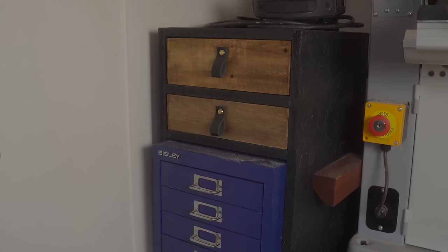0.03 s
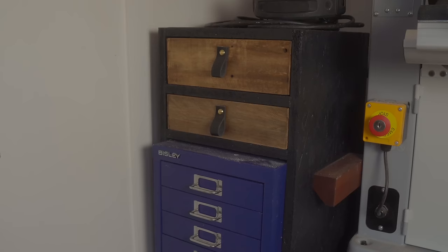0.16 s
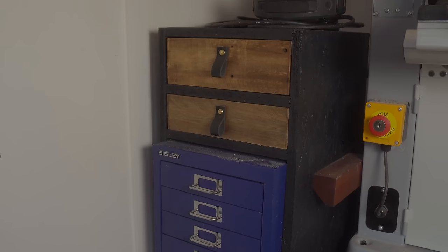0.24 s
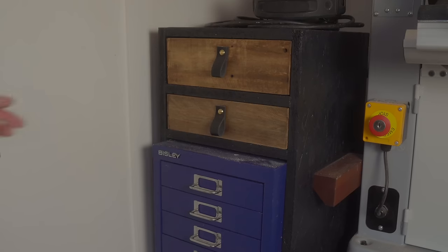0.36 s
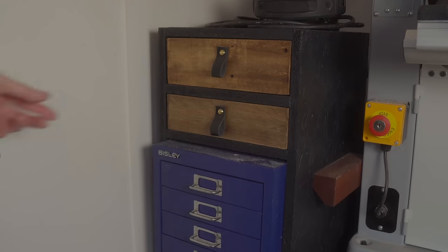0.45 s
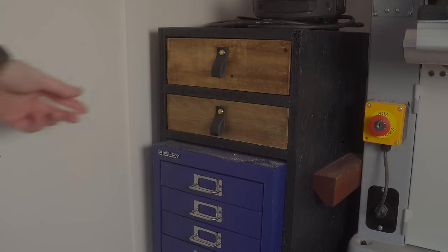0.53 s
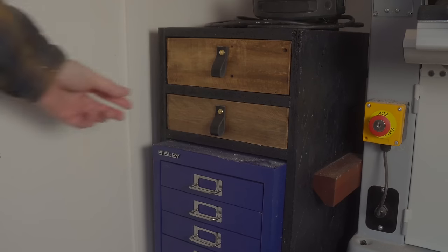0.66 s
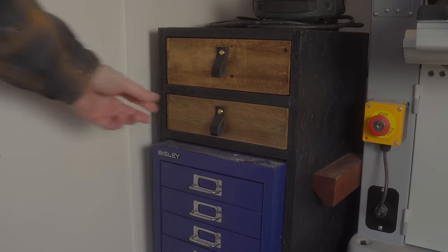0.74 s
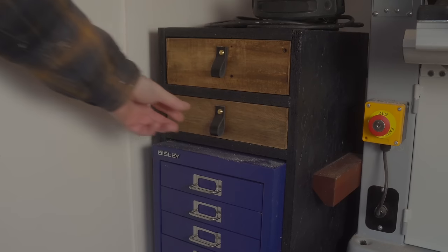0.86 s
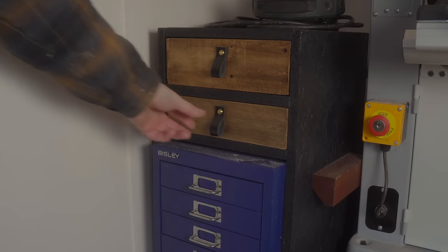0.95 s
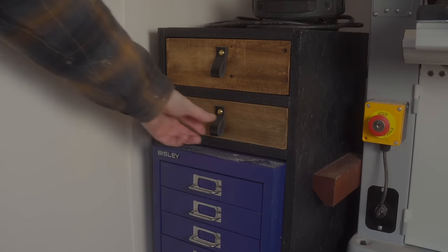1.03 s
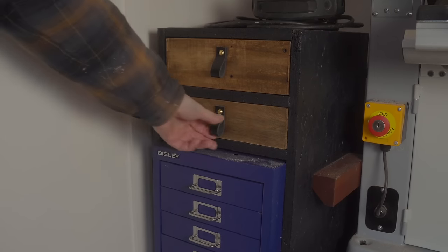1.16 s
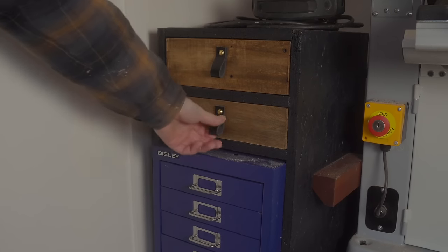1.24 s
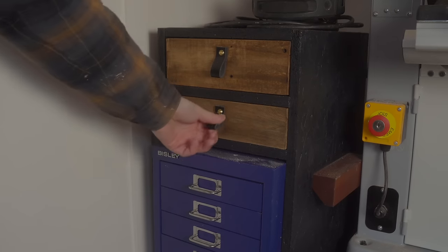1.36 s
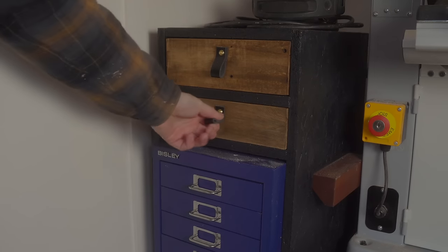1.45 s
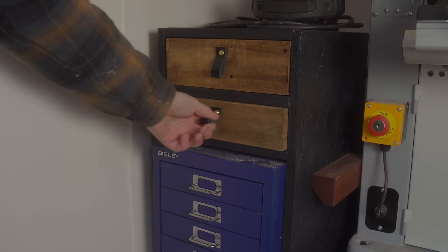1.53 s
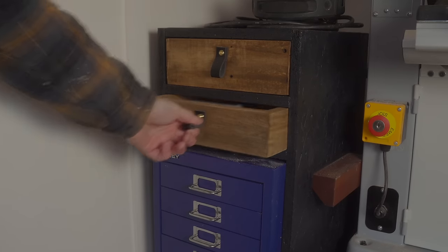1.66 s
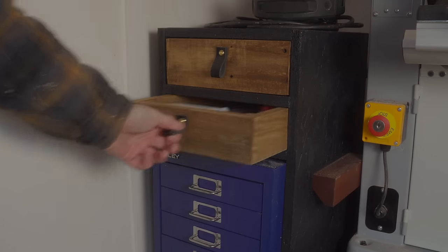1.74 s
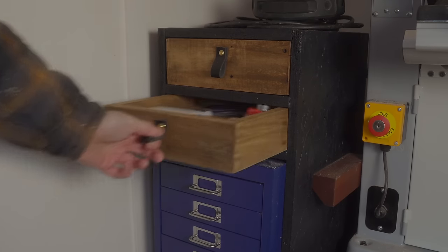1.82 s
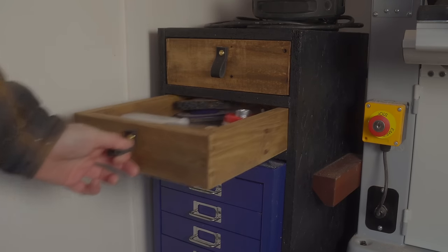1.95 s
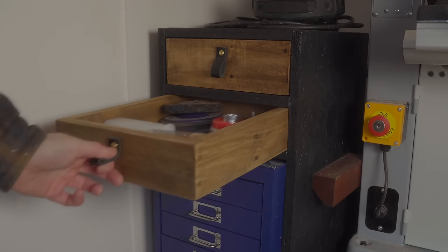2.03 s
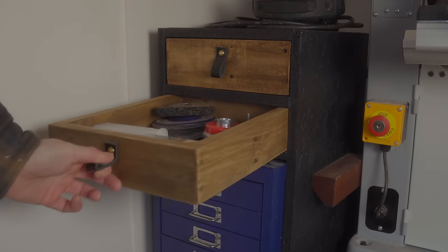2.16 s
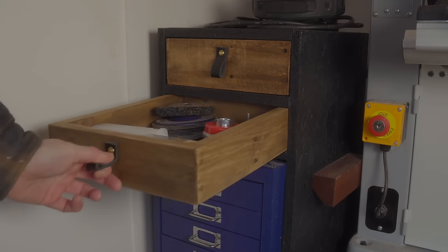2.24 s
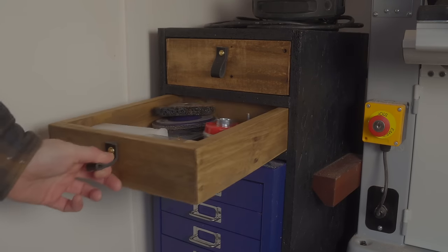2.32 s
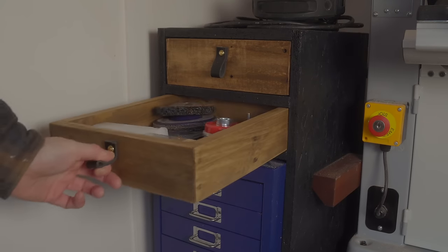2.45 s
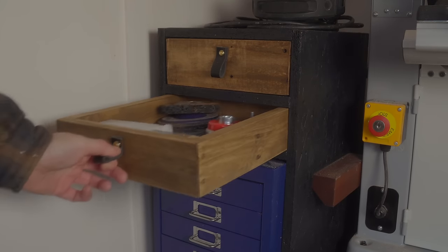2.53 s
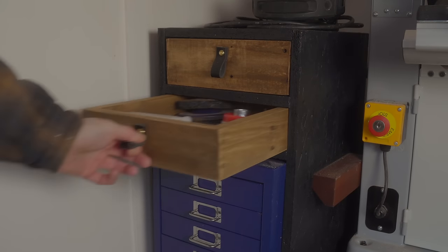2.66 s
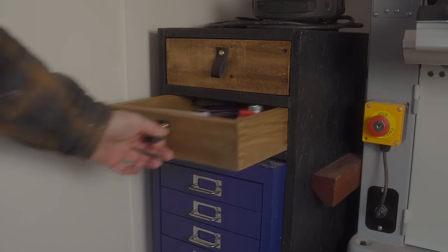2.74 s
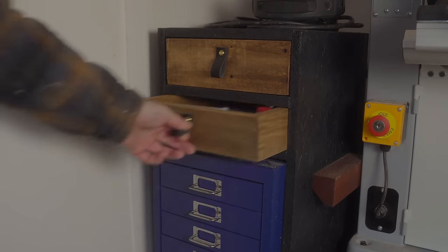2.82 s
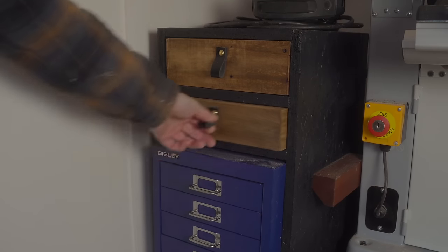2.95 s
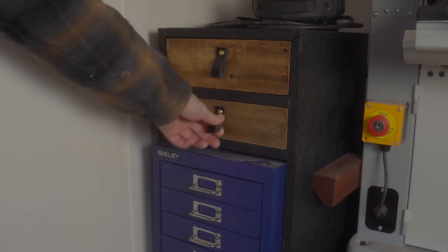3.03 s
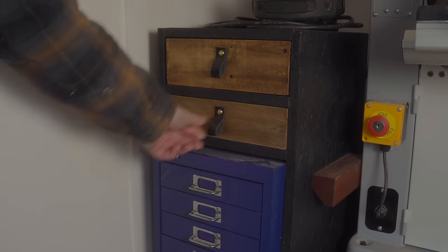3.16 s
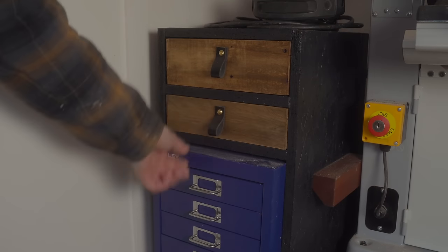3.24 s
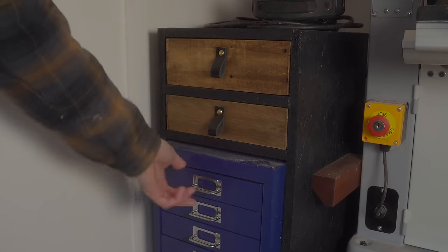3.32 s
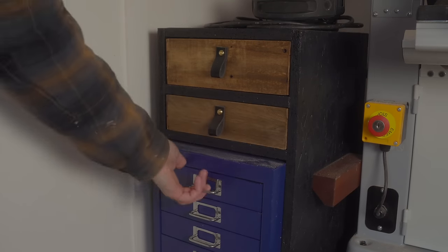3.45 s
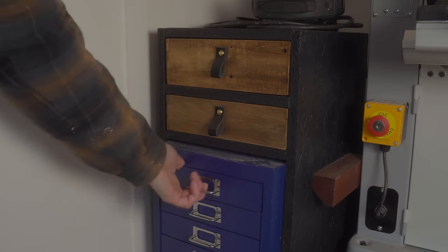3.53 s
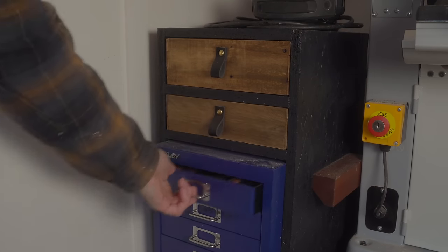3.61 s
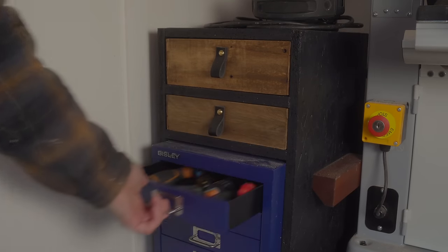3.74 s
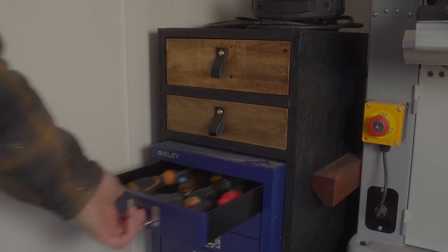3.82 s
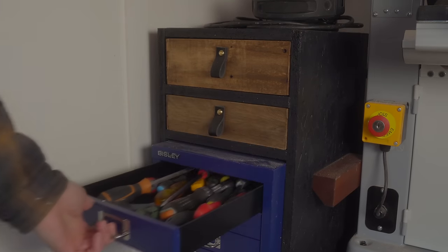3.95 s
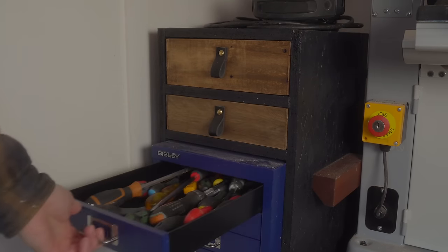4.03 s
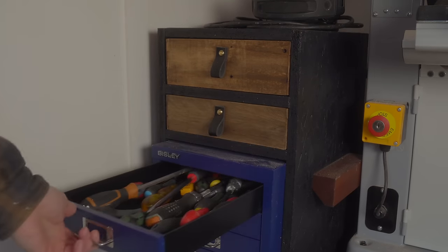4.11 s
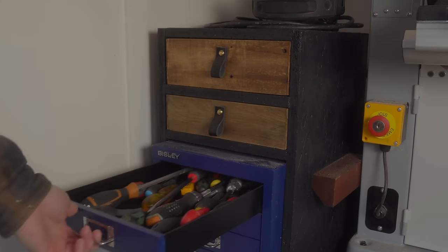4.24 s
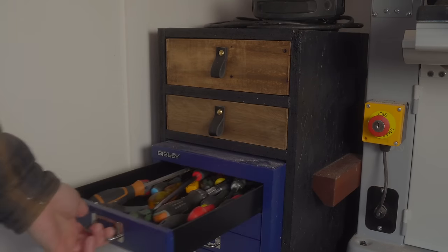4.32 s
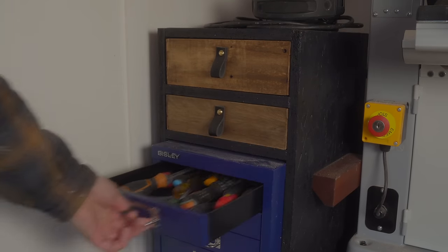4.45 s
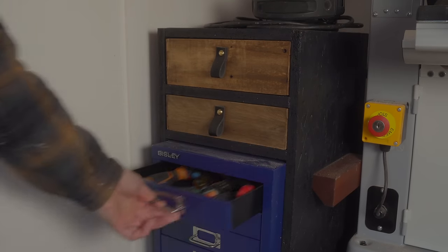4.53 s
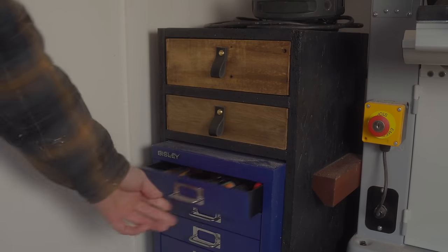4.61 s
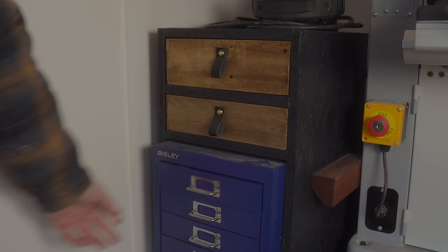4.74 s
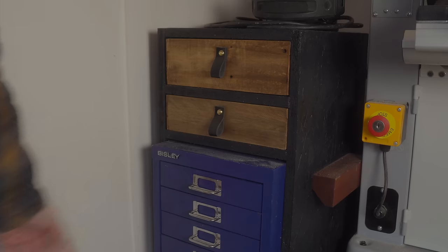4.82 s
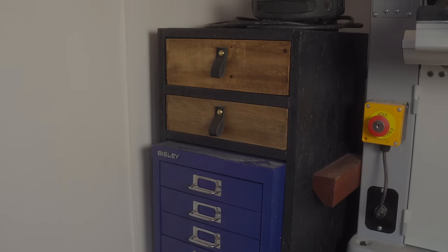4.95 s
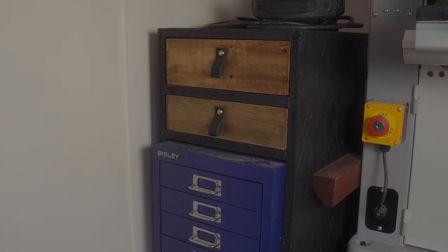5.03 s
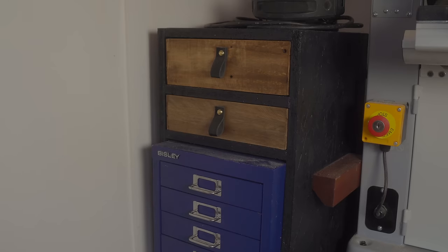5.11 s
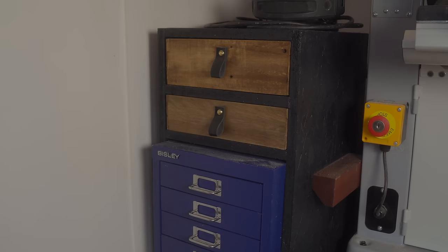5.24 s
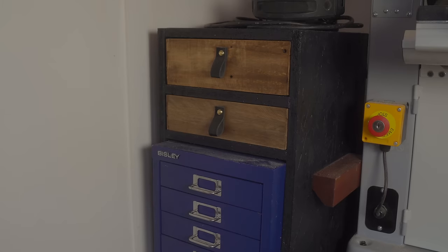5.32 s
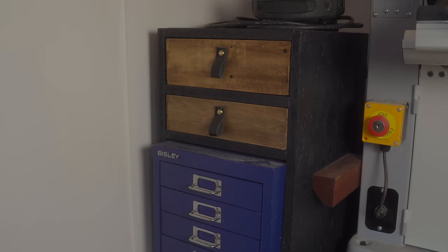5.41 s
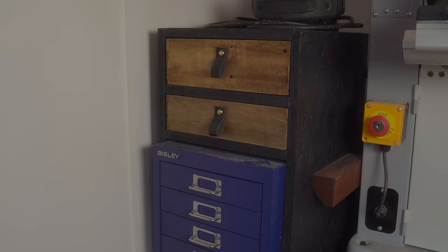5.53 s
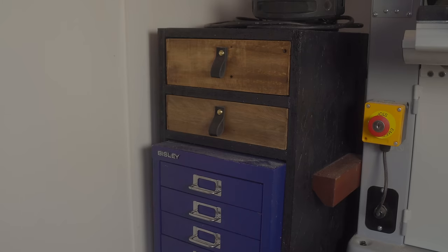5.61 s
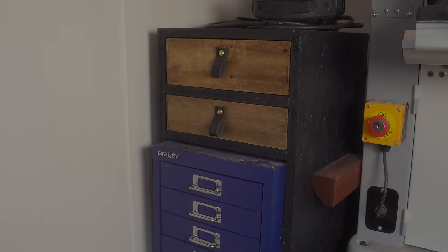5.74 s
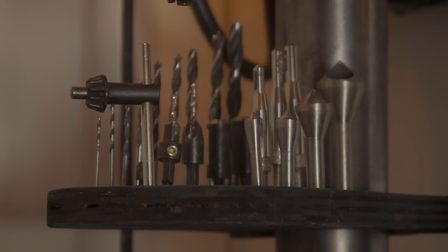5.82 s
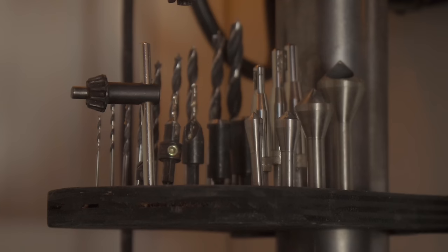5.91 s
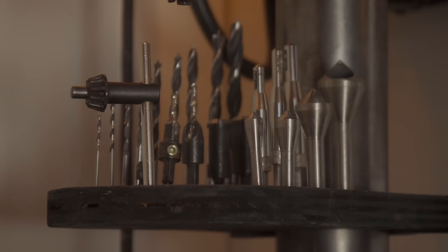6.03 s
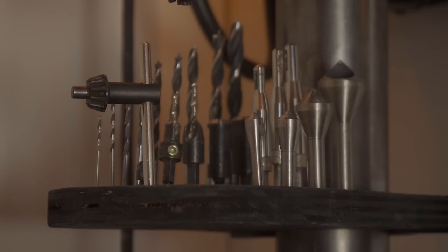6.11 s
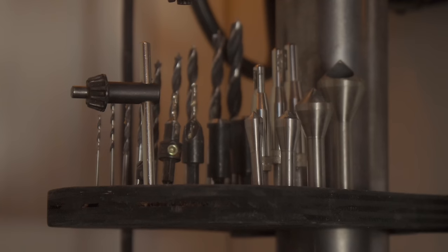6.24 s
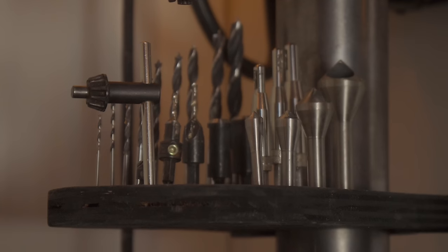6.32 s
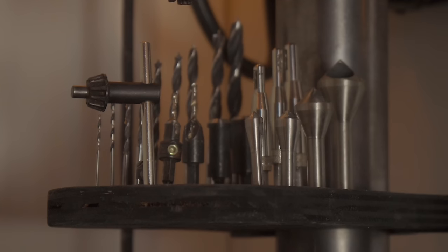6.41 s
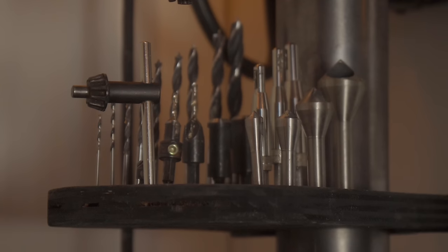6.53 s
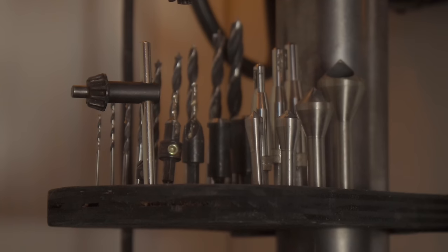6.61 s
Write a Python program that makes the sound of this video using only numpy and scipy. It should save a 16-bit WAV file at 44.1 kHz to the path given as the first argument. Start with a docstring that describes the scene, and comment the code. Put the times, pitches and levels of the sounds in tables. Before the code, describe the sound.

A loaded wooden drawer is pulled open and shoved shut with knocks, then a thin steel tool drawer slides out and clanks closed in a workshop.

```python
"""Two drawers in a small workshop

Close, in mono: a hand pulls a loaded wooden drawer open and pushes it shut, then a thin steel drawer below it.
Random slips of the runners and short blows, as tools shift and knock inside, ring the modes of each box;
coloured grains make the rasp. Clothes rustle and feet shift in shaped noise, soles thud on floorboard modes,
and feedback delays give the room. The quiet noise of the room drops near the end.
"""
import sys
import numpy as np
from scipy import signal
from scipy.fft import rfft, irfft, next_fast_len
from scipy.io import wavfile

SR = 44100
rng = np.random.default_rng(int(sys.argv[2]) if len(sys.argv) > 2 else 0)


def volts_from_db(level):
    """Convert decibel levels to linear amplitude ratios."""
    exponent = np.asarray(level, float) / 20
    return 10 ** exponent


def inscribe(sig):
    """Save sig as 16-bit PCM at rate SR to the path in sys.argv[1].

    A 1-D sig is mono; a 2-D sig holds one channel per row.
    Samples are clipped to [-1, 1] before scaling.
    """
    pcm = np.round(np.clip(np.atleast_2d(sig).T, -1, 1) * 32767)
    wavfile.write(sys.argv[1], SR, pcm.astype(np.int16))


N = 294147


def rms_one(x):
    """Scale to unit rms."""
    return x / np.sqrt(np.mean(x ** 2) + 1e-20)


def gains(strokes):
    """Turn every dB column into a gain in time, all but silent outside the strokes."""
    t = np.arange(N) / SR
    out = 0
    for rows in strokes:
        time_s, *columns = np.transpose(rows)
        out = out + np.array([volts_from_db(np.interp(t, time_s, db, -150, -150)) for db in columns])
    return out


def drift(rate_hz):
    """Slow random wander of rms 1: noise through two equal one-pole low-passes at rate_hz."""
    step = 20      # samples between wander points
    pole = np.exp(-2 * np.pi * rate_hz * step / SR)
    noise = rng.standard_normal(N // step + 2002)
    slow = signal.lfilter([1], [1, -2 * pole, pole ** 2], noise)[2000:]      # past the filter's run-in
    return np.interp(np.arange(N) / step, np.arange(len(slow)), rms_one(slow))


def colour(x, spectrum):
    """Minimum-phase shaping of x to a spectrum, rms gain 1 on white noise."""
    hz, db = np.transpose(spectrum)
    grid_hz = np.maximum(np.fft.rfftfreq(8192, 1 / SR), 1)
    magnitude = volts_from_db(np.interp(np.log(grid_hz), np.log(hz), db))
    cepstrum = irfft(np.log(magnitude))
    # folding the cepstrum forward makes the phase minimum
    cepstrum[1:4096] *= 2
    cepstrum[4097:] = 0
    response = irfft(np.exp(rfft(cepstrum)))
    return signal.fftconvolve(x, response / np.linalg.norm(response))[:N]


def grains(per_s, spread_db):
    """Random clicks of uneven size and either sign, rms 1."""
    size_db = spread_db * np.minimum(rng.exponential(1, N), 5)
    clicks = volts_from_db(size_db) * rng.choice([-1, 1], N)
    return rms_one(clicks * (rng.random(N) < per_s / SR))


def ring(push, hz, t60_s):
    """A mode: a unit click sets a dying sine of height 1 ringing."""
    r = volts_from_db(-60 / (t60_s * SR))
    w = 2 * np.pi * hz / SR
    return signal.lfilter([0, np.sin(w)], [1, -2 * r * np.cos(w), r * r], push + 1e-18)


def contacts(at_s, db, length_s, crisp):
    """Each blow is a dying chatter of force, unit energy times its level, with a click on its first sample."""
    out = np.zeros(N)
    span = 4000      # samples
    noise = rng.standard_normal((len(at_s), span))
    for s, level_db, tau_s, jolt in zip(at_s, db, length_s, noise):
        chatter = jolt * np.exp(-np.arange(span) / (max(tau_s, 3e-4) * SR))
        burst = chatter / np.linalg.norm(chatter)
        burst[0] += crisp
        start = round(s * SR)
        out[start:start + span] += volts_from_db(level_db) * burst
    return out


def room_tone():
    """Steady coloured noise, switching to a duller, quieter one near the end."""
    drop_s = 5.862
    # room noise before the drop: hz, level_db (per Hz, relative)
    early_spectrum = [(15, -38), (25, -8), (296, -4), (399, -10), (687, -7), (831, -13), (14400, -26),
                      (16500, -33)]
    # room noise after the drop: hz, level_db (per Hz, relative)
    late_spectrum = [(25, -7), (70, -4), (130, 2), (250, -7.5), (500, -8.5), (900, -11), (1200, -18),
                     (4000, -21), (8000, -21.5), (15000, -23.5), (16500, -34.5)]
    early = volts_from_db(-65) * colour(rng.standard_normal(N), early_spectrum)
    late = volts_from_db(-68) * colour(rng.standard_normal(N), late_spectrum)
    return np.where(np.arange(N) < drop_s * SR, early, late)


def rustle():
    """Cloth whispers above as coloured grains, weight shifts below as coloured noise."""
    # strokes of clothes and shuffling: time_s, low_db, high_db
    strokes = [
        [(0.0, -55, -57.5), (0.132, -63, -56.5), (0.168, -55, -53), (0.348, -68.5, -65), (0.42, -62, -64.5),
         (1.04, -65, -62.5), (1.096, -54.5, -68), (1.128, -72, -61), (1.15, -56, -66), (1.26, -81, -78),
         (1.5, -95, -94)],
        [(5.05, -58, -83), (5.152, -72, -68), (5.17, -55.5, -65), (5.25, -59, -69.5), (5.5, -74, -67.5),
         (5.86, -78, -68.5)],
    ]
    # rubbing cloth: hz, level_db (per Hz, relative)
    cloth_spectrum = [(530, -19.5), (900, -0.5), (1040, -10), (1360, -6), (1990, -7.5), (2830, -8.5),
                      (13800, -15.5), (16000, -18.5)]
    # shuffling: hz, level_db (per Hz, relative)
    shuffle_spectrum = [(47, -61), (80, -21), (123, -11.5), (260, -1.5), (305, -5.5), (353, -4),
                        (1500, -19.5), (1950, -46), (3300, -120)]
    low, high = gains(strokes)
    whisper = high * volts_from_db(0.5 * drift(43.0)) * grains(9000., 2.0)
    shuffle = low * volts_from_db(1.9 * drift(19.0)) * rng.standard_normal(N)
    return colour(whisper, cloth_spectrum) + colour(shuffle, shuffle_spectrum)


def footfalls():
    """Soft soles set the floor thudding: short chatters of force ring its modes."""
    # footfalls: start_s, level_db (relative), contact_s
    steps = [(0.381, -52.5, 0.025), (0.62, -29, 0.12), (5.168, -49, 0.028)]
    # floorboard modes: hz, level_db (relative), t60_s
    floor_modes = [(74, -10, 0.24), (119.7, -4.5, 0.21), (219, 2.5, 0.072), (278, -1.5, 0.092),
                   (386, 5, 0.093), (520, 0.5, 0.052), (603, -9.5, 0.12), (795, -7, 0.025),
                   (1230, -0.5, 0.0073)]
    start_s, level_db, contact_s = np.transpose(steps)
    push = contacts(start_s, level_db - 11.0, contact_s, crisp=0.72)
    out = np.zeros(N)
    for k, (hz, mode_db, t60_s) in enumerate(floor_modes):
        out += (-1) ** k * volts_from_db(mode_db) * ring(push, hz, t60_s)
    return out


def drawer(strokes, centre, knocks, modes, rasp, tick, slips, chatter_db, rasp_share, blow_db,
           split, focus_db, lean_db, roam_db, crisp):
    """Slips of the runners and blows drive the same modes; rasp and ticks are too dense in modes to ring.

    blow_db and crisp are for clack, thump and tick; slips are for low modes, high modes and rasp.
    """
    thump_top_hz = 800      # modes below take the thump, those above the clack
    rumble, hiss = gains(strokes)
    # the edges chatter between rumble and rasp
    chatter = volts_from_db(chatter_db) * rumble ** (1 - rasp_share) * hiss ** rasp_share
    rumble_hz = np.interp(np.arange(N) / SR, *np.transpose(centre))
    start_s, clack_db, thump_db, tick_db, clack_hz = np.transpose(knocks)
    # 15 ms of chatter at a -21 dB thump: longer when heavier, shorter when clacking above 1100 Hz
    length_s = 0.015 * volts_from_db(0.16 * (thump_db + 21)) * np.minimum(1100 / clack_hz, 1)
    low_slips, high_slips, rasp_slips = slips
    ticks = contacts(start_s, tick_db + blow_db[2], length_s, crisp[2])
    out = colour(hiss * rasp_slips, rasp) + colour(ticks, tick)
    for k, (hz, level_db, t60_s) in enumerate(modes):
        # the rubbing spot roams; a long ring piles up more slips
        steady = volts_from_db(roam_db * drift(4.2)) / np.sqrt(t60_s * SR / 2.0)
        if hz < thump_top_hz:
            # how far the box is held picks the modes that speak
            lean = volts_from_db(-lean_db * np.minimum(np.log2(hz / rumble_hz) ** 2, 1.2))
            thumps = contacts(start_s, thump_db + blow_db[1], length_s, crisp[1])
            push = lean * (steady * rumble * low_slips + thumps)
            out += (-1) ** k * volts_from_db(level_db) * ring(push, hz, t60_s)
        else:
            # a blow favours modes near its own pitch
            near_db = -focus_db * np.log2(hz / clack_hz) ** 2
            clacks = contacts(start_s, clack_db + blow_db[0] + near_db, length_s, crisp[0])
            push = steady * chatter * high_slips + clacks
            for side in (-1, 0, 1):      # sides, back and bottom ring at neighbouring pitches
                side_hz = hz * (1 + side * split)
                out += (-1) ** (k + side) * volts_from_db(level_db) * ring(push, side_hz, t60_s)
    return out


def wooden_drawer():
    """Wood sticks and lets go: few, lumpy slips under a fast random judder."""
    # drag on the runners, pulled then pushed: time_s, rumble_db, rasp_db (all relative)
    wood_slide = [
        [(1.55, -54.5, -56.5), (1.61, -43, -63.5), (1.644, -28, -50.5), (1.75, -30, -56), (1.765, -9.5, -50),
         (1.80, -26.5, -47.5), (1.85, -20, -49.5), (1.961, -24, -49.5), (2.05, -43, -56.5), (2.07, -34, -51.5),
         (2.235, -32.5, -45.5), (2.336, -35, -47.5), (2.39, -60, -89), (2.47, -48, -90)],
        [(2.5, -51, -82), (2.608, -44, -58.5), (2.706, -33, -52), (2.76, -32.5, -50.5), (2.84, -34, -51.5),
         (2.9, -25, -42.5), (2.986, -31, -53), (3.04, -24.5, -47), (3.069, -23, -45.5), (3.074, -4.5, -56),
         (3.147, -11.5, -47), (3.152, -21, -50), (3.19, -23, -45.5), (3.236, -42, -53), (3.376, -45.5, -83),
         (3.5, -58, -63)],
    ]
    # where the rumble is centred as load and grip change: time_s, centre_hz
    wood_centre = [(1.7, 430), (1.78, 341), (1.86, 410), (2.23, 375), (2.27, 553), (2.6, 416), (2.85, 385),
                   (3.04, 450), (3.075, 556), (3.15, 525), (3.172, 420)]
    # blows on wood: start_s, clack_db, thump_db, tick_db (all relative), clack_hz
    wood_blows = [(1.086, -65, -54, -52, 1060), (1.15, -44.5, -72, -70, 1310),
                  (1.542, -34.5, -52, -40, 2520), (1.637, -24.5, -24, -40, 1280),
                  (1.666, -21.5, -23.5, -66, 1400), (1.698, -15, -29.5, -50.5, 930),
                  (1.805, -18.5, -19.5, -38, 900), (1.812, -40.5, -15, -50, 826),
                  (1.849, -35, -19, -58, 1180), (1.956, -29, -26.5, -33, 1170), (2.056, -20, -21, -44, 930),
                  (2.142, -14, -29.5, -71.5, 2460), (2.178, -12, -23, -29, 875),
                  (2.241, -7, -32.5, -44, 2160), (2.248, -3, -30.5, -39, 1160),
                  (2.285, -10, -23.5, -83.5, 1760), (2.661, -18, -47, -72, 1100),
                  (2.844, -24, -19.5, -51.5, 837), (2.858, -14, -14.5, -39, 1040),
                  (2.867, -7.5, -19.5, -25, 1020), (2.9, -16, -14, -35.5, 896),
                  (3.014, -31.5, -21.5, -58, 880), (3.072, -9.5, -6.5, -31.5, 760),
                  (3.098, -14, -6.5, -32.5, 830), (3.125, -18, -6.5, -35.5, 867),
                  (3.162, -15.5, -34.5, -35.5, 834), (3.198, -23.5, -25, -63, 1250)]
    # wooden box modes: hz, level_db (relative), t60_s
    wood_modes = [(81.5, -21.5, 0.59), (131, -24, 0.2), (190, -29, 0.068), (259.2, -10, 0.21),
                  (283, -6, 0.049), (337.5, 2, 0.041), (416.3, -1.5, 0.062), (466.7, 0.5, 0.058),
                  (529.6, -4.5, 0.022), (638.6, -2, 0.048), (734, -0.5, 0.024), (880, 4.5, 0.022),
                  (1020, -7, 0.018), (1097.5, 1.5, 0.038), (1241.4, -1, 0.032), (1400, -4, 0.023),
                  (1622, -3.5, 0.026), (1725, 1.5, 0.018), (1803, -0.5, 0.028), (2170, 1, 0.015),
                  (2630, -9, 0.035), (2930, -2.5, 0.017), (3180, -16.5, 0.028), (3600, -14.5, 0.09),
                  (4080, -16.5, 0.047), (4570, -15, .02), (5670, -20, 0.023), (6266, -15, 0.015)]
    # wood rasp: hz, level_db (per Hz, relative)
    wood_hiss = [(710, -32), (1200, -0.5), (1860, -15), (2030, -14.5), (3540, -12.5), (4300, -14.5),
                 (10900, -23), (14000, -35), (16300, -66.5)]
    # hard edges touching: hz, level_db (per Hz, relative)
    edge_tick = [(2650, -25.5), (4500, 3), (7350, 3.5), (9210, 0.5), (11000, 3), (12000, -4.5), (13900, 6),
                 (16300, -25)]
    judder = volts_from_db(3.2 * drift(30.0))
    slips = judder * grains(1300., 3.94), judder * grains(1500., 2.9), judder * grains(6000., 2.7)
    return drawer(wood_slide, wood_centre, wood_blows, wood_modes, wood_hiss, edge_tick, slips,
                  chatter_db=0.0, rasp_share=0.58, blow_db=(-12., -3., 21.), split=0.025,
                  focus_db=3.5, lean_db=8.5, roam_db=3.0, crisp=(1.1, .8, .3))


def steel_drawer():
    """Painted steel drags in a dense rasp: more slips, more even; the ticks share the rasp's colour."""
    # drag on the runners, pulled then pushed: time_s, rumble_db, rasp_db (all relative)
    steel_slide = [
        [(3.45, -48, -67), (3.556, -44.5, -63.5), (3.568, -64, -38.5), (3.614, -31.5, -54.5),
         (3.664, -24.5, -53.5), (3.73, -37.5, -47), (3.906, -39.5, -38), (4.03, -52, -39.5),
         (4.09, -40.5, -48.5), (4.12, -30, -52), (4.172, -57, -66.5), (4.28, -81.5, -109)],
        [(4.33, -60, -90), (4.405, -41.5, -55.5), (4.425, -18.5, -36.5), (4.458, -26.5, -36),
         (4.526, -36.5, -33), (4.714, -35.5, -44), (4.794, -47.5, -53), (4.87, -42, -63), (4.89, -34, -37),
         (4.943, -27, -51.5), (4.985, -40, -64), (5.1, -67, -88)],
    ]
    # where the rumble is centred as load and grip change: time_s, centre_hz
    steel_centre = [(3.5, 400), (3.9, 500), (4.12, 570), (4.431, 460), (4.5, 470), (4.56, 400),
                    (4.741, 600), (4.86, 400), (4.91, 267), (5.0, 215)]
    # blows on steel: start_s, clack_db, thump_db, tick_db (all relative), clack_hz
    steel_blows = [(3.488, -50, -39, -49.5, 900), (3.566, -52, -29.5, -35, 1230),
                   (3.839, -44, -35, -47, 870), (4.099, -36, -34, -55, 900),
                   (4.413, -1.5, -14.5, -20.5, 1900), (4.471, -16, -30, -22.5, 985),
                   (4.688, -45, -32, -32, 805), (4.725, -22, -33, -43, 940),
                   (4.875, -17, -25.5, -29.5, 940), (4.882, -24, -20.5, -35, 842)]
    # steel pan modes: hz, level_db (relative), t60_s
    steel_modes = [(129.7, -44.5, 0.121), (228, -11, 0.2), (262.5, -11.5, 0.14), (342.5, -1, 0.04),
                   (463, -1.5, 0.05), (529, -2.5, 0.022), (625, 1, 0.045), (734, -5, 0.039),
                   (867, -7, 0.11), (985, -1, 0.036), (1187, -1, 0.025), (1380, -12, 0.069),
                   (1575, 0, 0.023), (1810, -6, 0.069), (2020, 0.5, 0.026), (2393, -6, 0.04),
                   (2855, 1.5, 0.014), (3434, -5, 0.02), (3720, -5, 0.021), (4000, -9, 0.05),
                   (4835, -13.5, 0.15), (5340, -16.5, 0.041), (5670, -11.5, 0.093), (6940, -20, .04),
                   (6690, -10.5, 0.033), (7810, -23.5, 0.021)]
    # steel rasp: hz, level_db (per Hz, relative)
    steel_hiss = [(710, -0.5), (1200, 2), (1860, -6.5), (2720, -2), (3070, 0), (4750, -2.5), (5590, -2.5),
                  (12100, -9), (13800, -9), (15800, -15.5), (16300, -25.5)]
    drag = volts_from_db(0.69 * drift(30.0))
    slips = drag * grains(1500., 2.67), drag * grains(2700.0, 3.5), drag * grains(11000.0, 2.3)
    return drawer(steel_slide, steel_centre, steel_blows, steel_modes, steel_hiss, steel_hiss, slips,
                  chatter_db=-1.5, rasp_share=0.77, blow_db=(-15., -4., 20.), split=.045,
                  focus_db=3.0, lean_db=11.5, roam_db=5.0, crisp=(.9, .7, .3))


def workshop(x):
    """Reflections of the small room: ten feedback delays, duller on every round."""
    t60_s, wall_cut_hz = 0.3, 14000
    size = next_fast_len(N + SR)
    delay = np.exp(-2j * np.pi * np.arange(size // 2 + 1) / size)      # one sample late
    dull = np.exp(-2 * np.pi * wall_cut_hz / SR)
    walls = (1 - dull) / (1 - dull * delay)
    tail = 0
    for k, lag_s in enumerate(np.geomspace(.011, .037, num=10)):
        loop = volts_from_db(-60 * lag_s / t60_s) * walls * delay ** round(lag_s * SR)
        tail = tail + (-1) ** k * loop / (1 - loop)
    return irfft(rfft(x, size) * tail, size)[:N]


def scene():
    """Drawers and footfalls close by and in the room, then the quiet layers."""
    # small boxes move little air in the deep bass
    small_box = signal.butter(4, 110.9, "high", fs=SR, output="sos")
    drawers = signal.sosfilt(small_box, wooden_drawer() + steel_drawer())
    near = drawers + footfalls()
    reflections = volts_from_db(-18) * workshop(near)
    return (near + reflections + rustle() + room_tone())[None]


def low_pass(x):
    """Removes everything above the highest recorded frequency."""
    return signal.sosfilt(signal.butter(12, 16630, fs=SR, output="sos"), x)


def record(dry):
    """Peaks are rounded softly, then the top is cut steeply."""
    rounded = 1.022 * np.tanh(dry / 0.78)
    top_cut = signal.cheby2(16, 70, 16600, fs=SR, output="sos")      # 70 dB down from 16600 Hz
    finished = signal.sosfilt(top_cut, rounded)
    return low_pass(finished)


dry = scene()
out = record(dry)
inscribe(out)
```